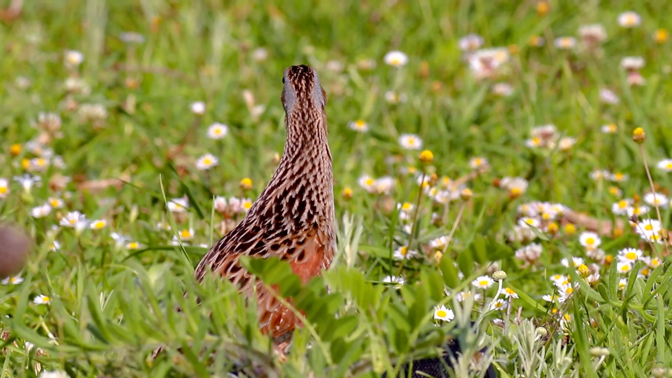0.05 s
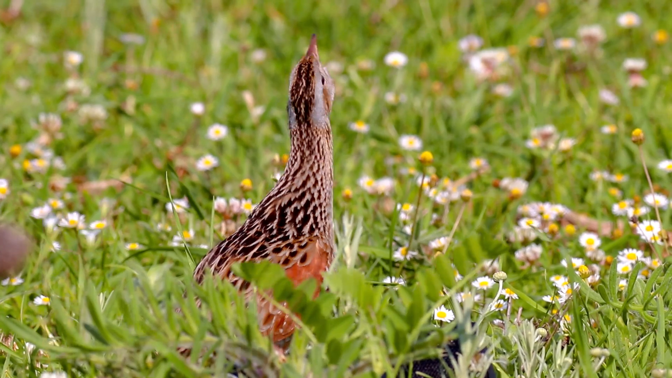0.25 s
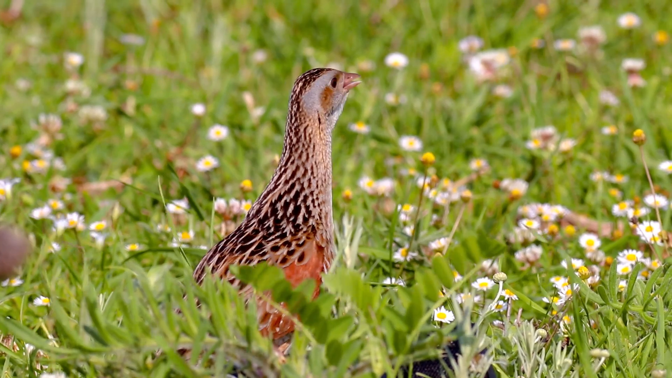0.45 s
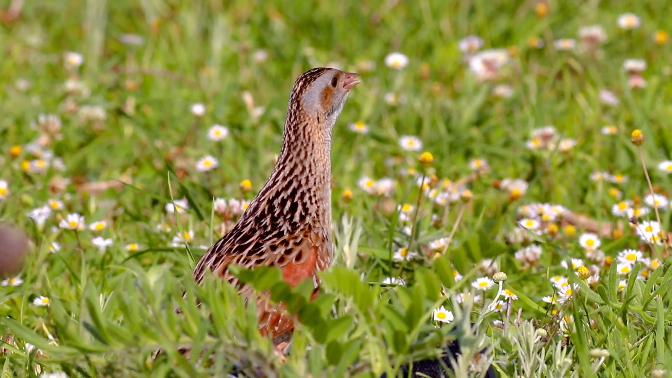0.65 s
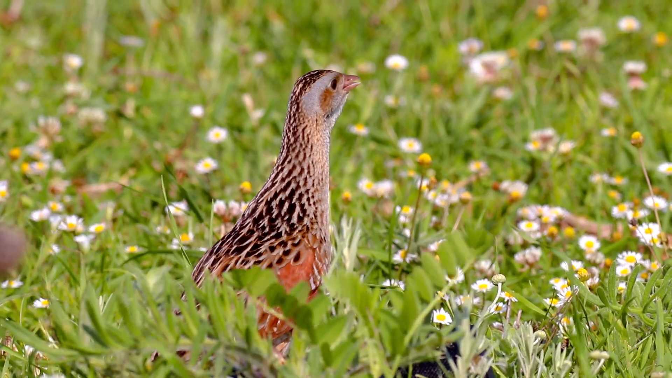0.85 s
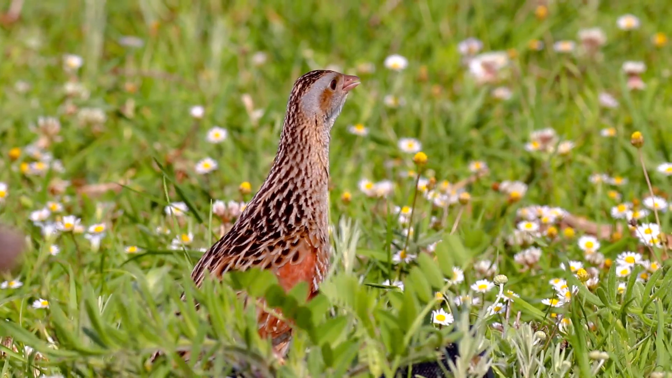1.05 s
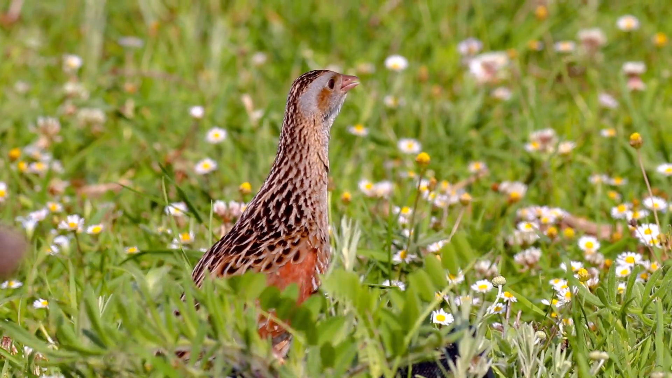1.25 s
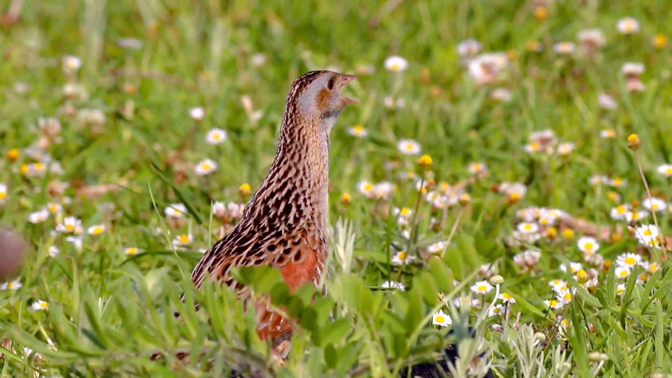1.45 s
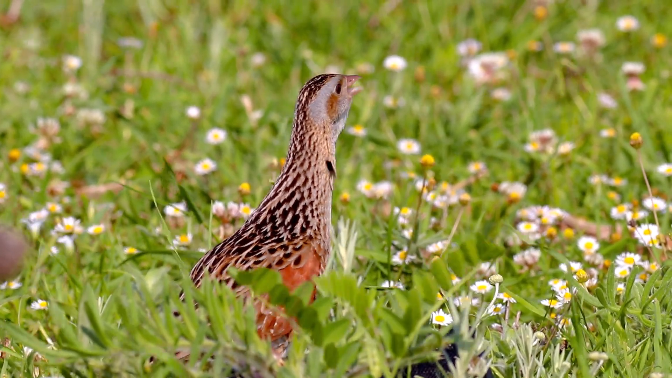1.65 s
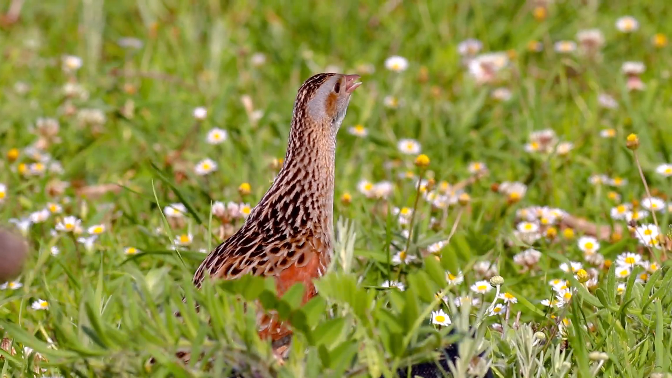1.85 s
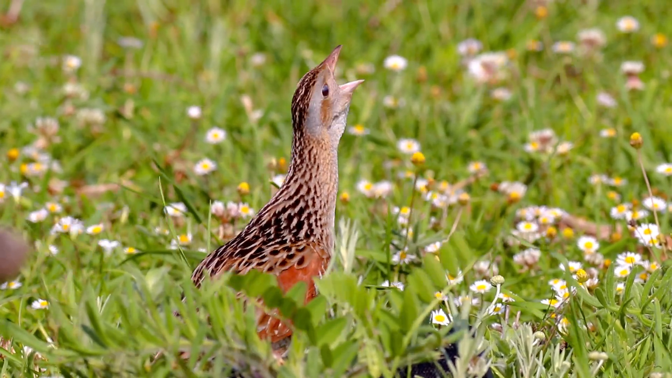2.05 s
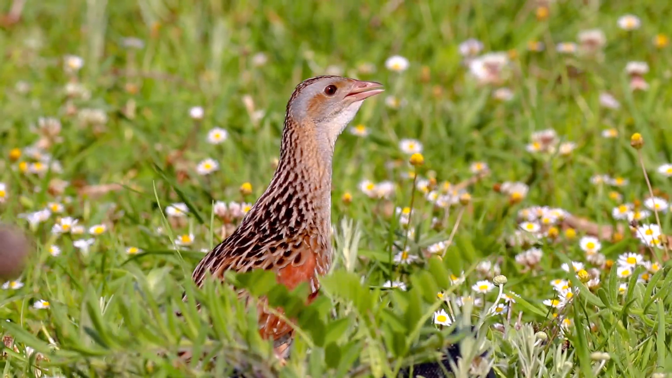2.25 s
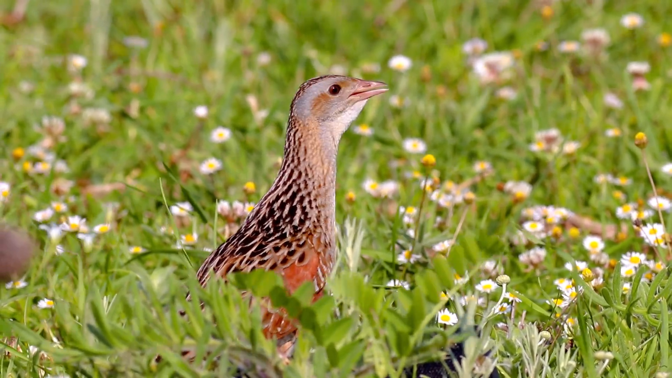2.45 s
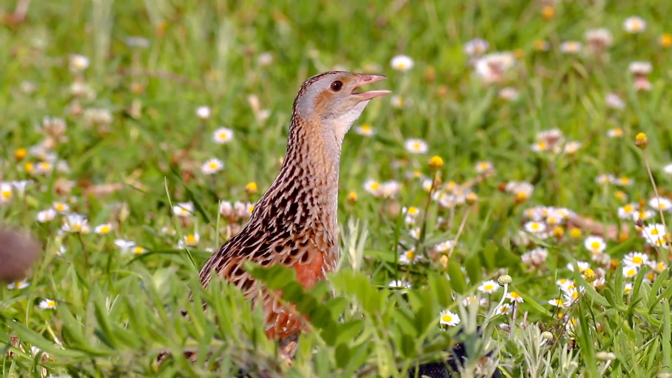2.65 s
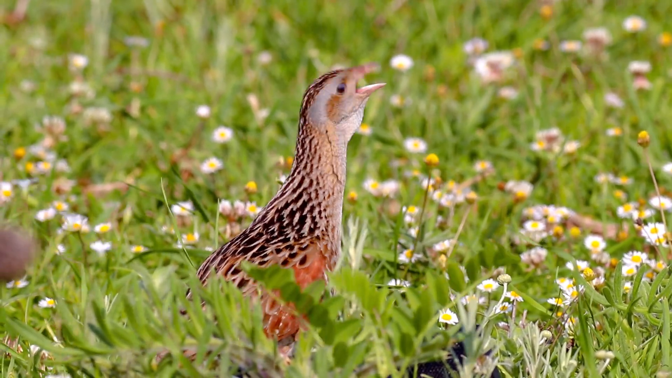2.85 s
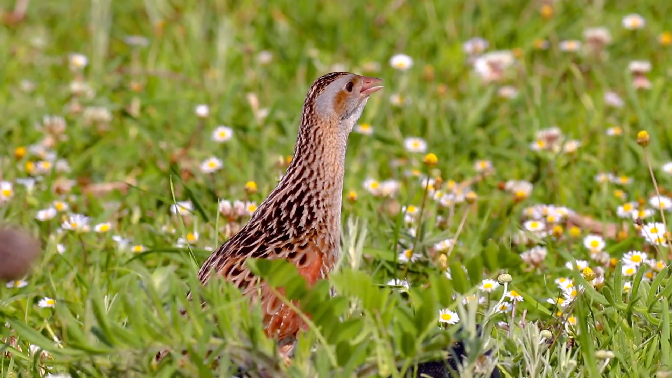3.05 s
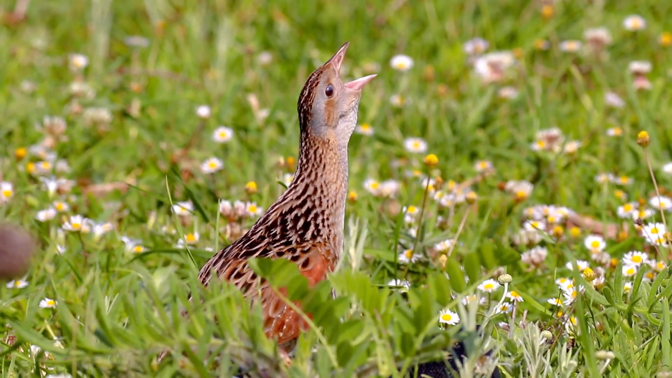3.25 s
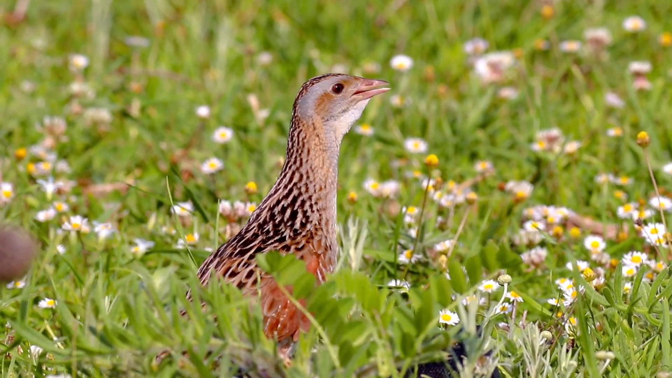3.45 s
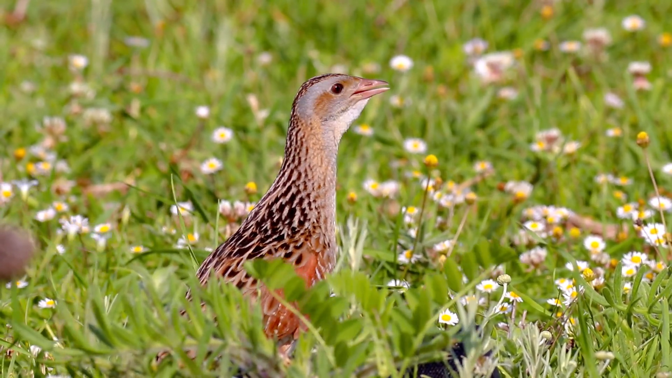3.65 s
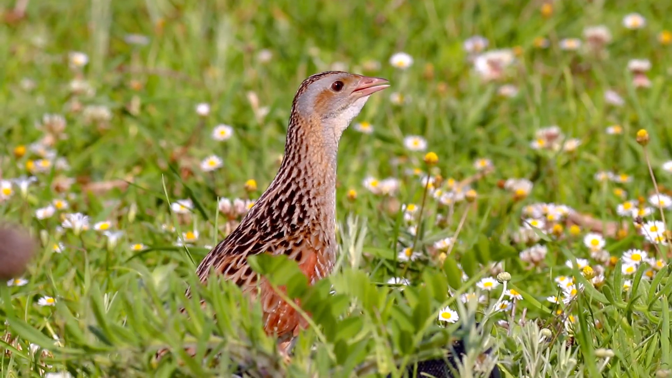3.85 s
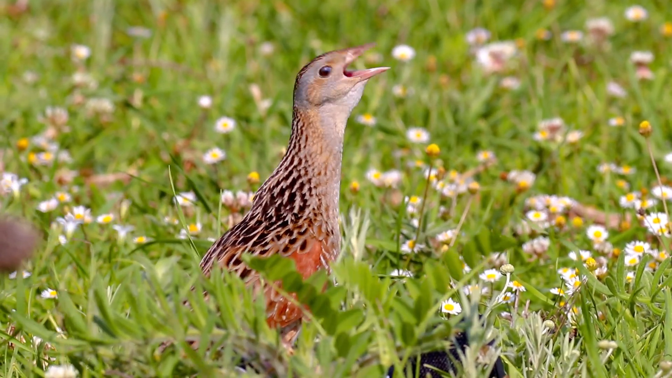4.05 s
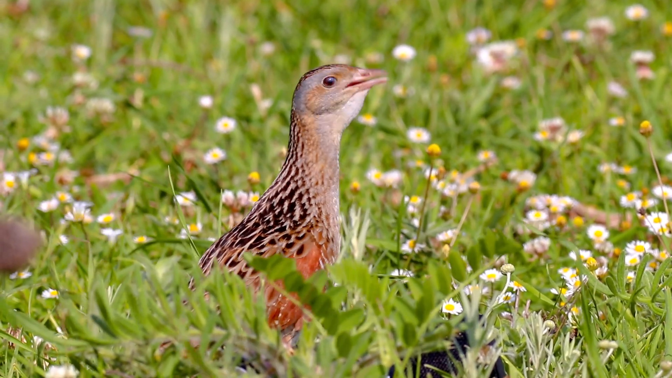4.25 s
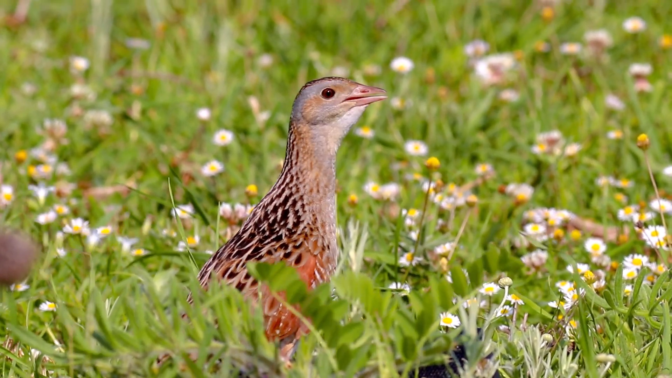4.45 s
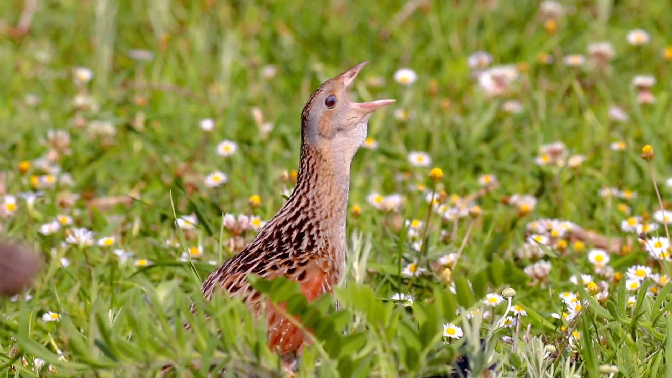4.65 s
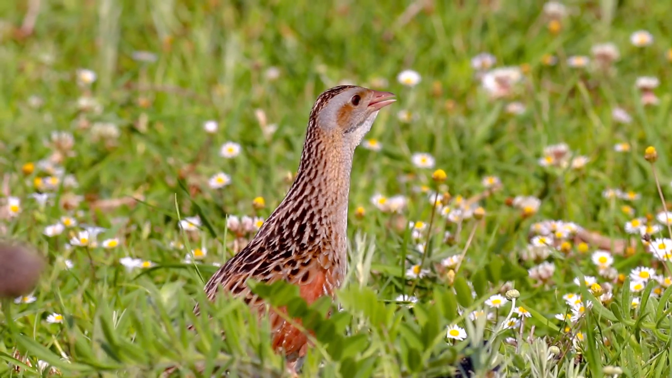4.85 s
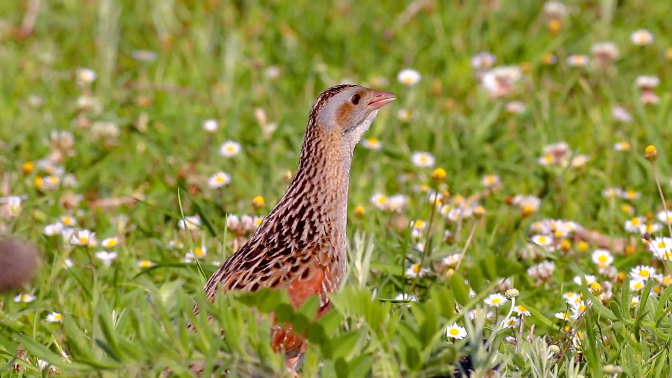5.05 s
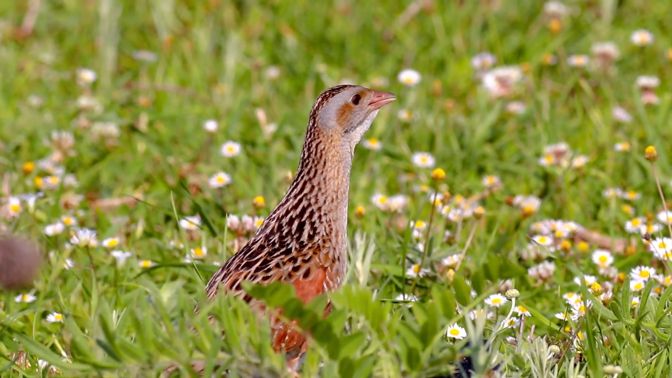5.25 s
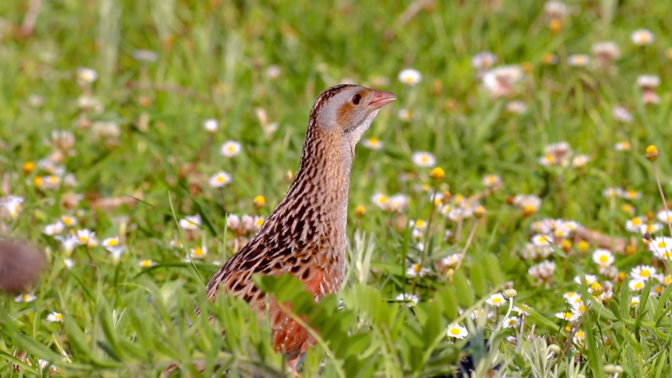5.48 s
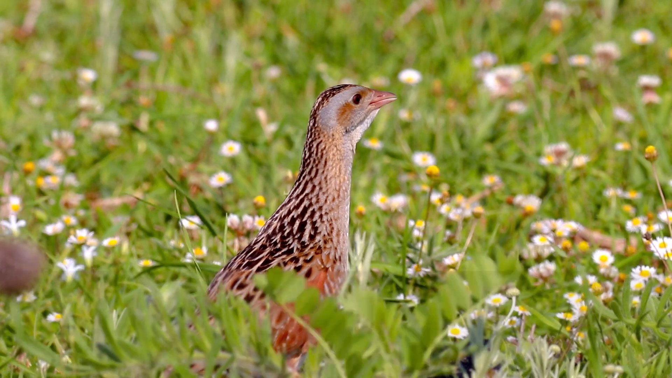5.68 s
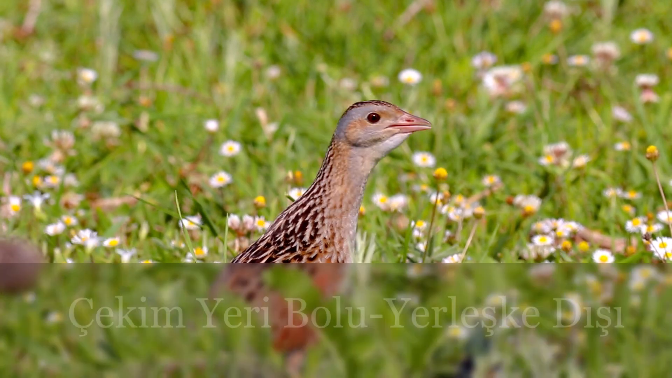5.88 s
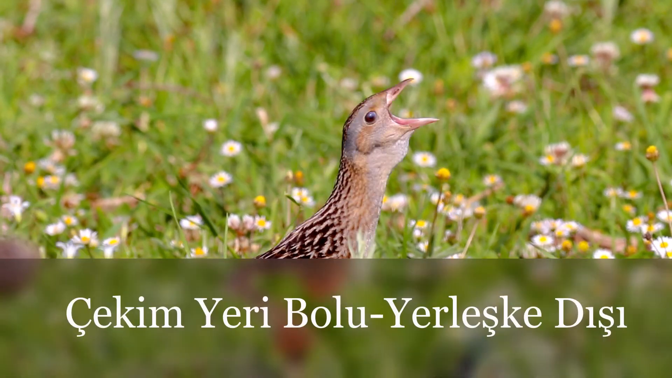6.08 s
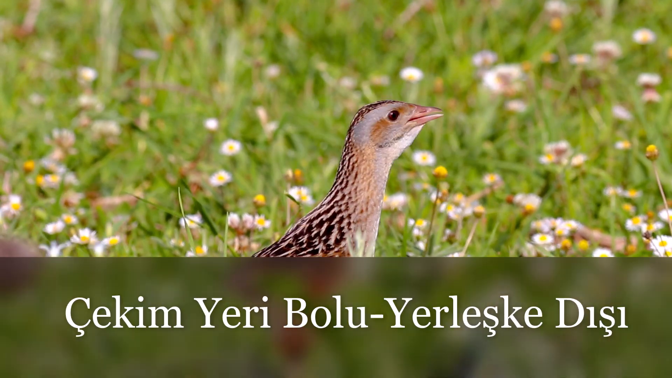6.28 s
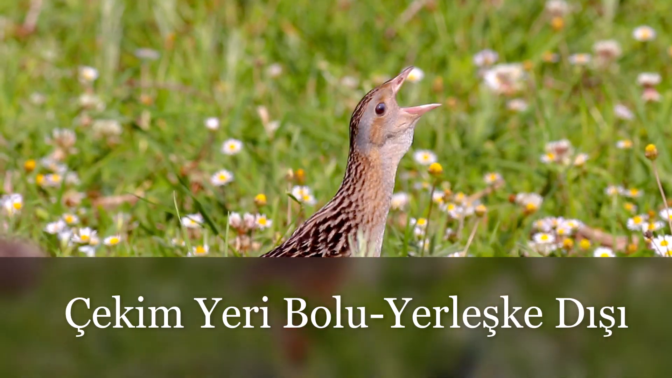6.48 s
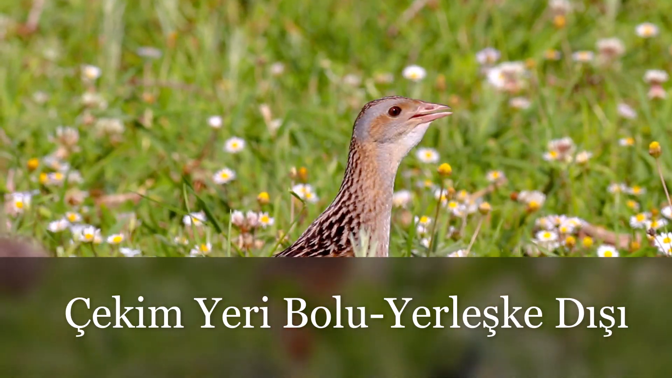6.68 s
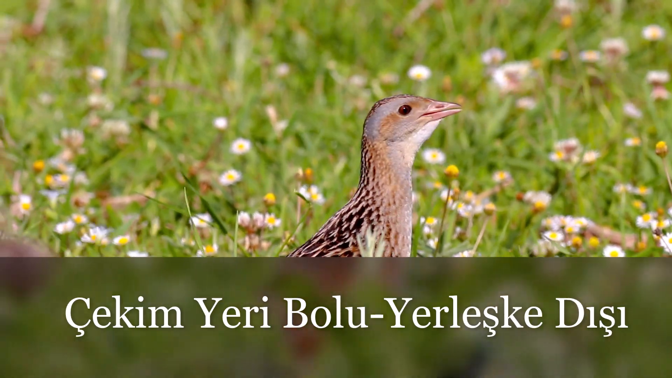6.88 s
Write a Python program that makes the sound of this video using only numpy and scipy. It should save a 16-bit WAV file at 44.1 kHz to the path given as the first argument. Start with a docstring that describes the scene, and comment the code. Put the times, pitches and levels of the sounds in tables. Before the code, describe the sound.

A crake very close to the microphone gives dry, mechanical double rasps, each a quick rattle of clicks under a fifth of a second. Between them small birds twitter thinly over a distant soft rush. A low wind gust buffets the microphone around three seconds. Later come sharp chips, buzzy chirps and a farther rival's answering rasps.

```python
"""A meadow: a corn crake rasps its double call close by, and a rival further off answers with two rasps.
Each rasp is a train of syrinx pulses in limping threes; grass scatters it and a wood edge throws it back.
Small birds twitter, chip and chirp as gliding whistles over a far rush and rumble of filtered noise.
Wind and soft bumps, also shaped noise, play on the microphone; gain control ducks everything when it gets loud."""
import sys
import numpy as np
from scipy import signal
from scipy.fft import rfft, irfft
from scipy.io import wavfile
from scipy.ndimage import uniform_filter1d

SR = 44100
rng = np.random.default_rng(int(sys.argv[2]) if len(sys.argv) > 2 else 0)


def output_pcm(signal):
    """Save a mono or channel-first signal as 16-bit PCM at the path in sys.argv[1].

    Samples are clipped to [-1, 1] before scaling.
    """
    pcm = np.clip(np.atleast_2d(signal).T, -1, 1) * 32767
    wavfile.write(sys.argv[1], SR, np.round(pcm).astype(np.int16))


N = 305172
TIME = np.arange(N) / SR

# rasps of the near bird: first pulse t/s, last pulse t/s, mid-rasp drag/ms, relative level/dB,
# treble from 10 kHz up/dB, left minus right/dB
RASPS = [(-.27, -.1, 0.91, -1, 0, 0), (.2513, .4343, 1.0, -1.5, -2.5, 1.5),
         (1.555, 1.698, 1.44, -1.5, -3.5, 1.5), (2.0024, 2.175, 1.6, -1, -2.5, 0.5),
         (2.7664, 2.9188, .5, -2, 1.5, 0.5), (3.2322, 3.4052, 1.87, -1.5, -3.5, -0.5),
         (4.1564, 4.3002, 0.39, -1, 3.5, 0.5), (4.6131, 4.7802, 1.2, -2, 3.5, 0),
         (6.0654, 6.2086, 0.45, -3, 1.5, 0), (6.5411, 6.7064, 2.28, -1.5, 0.5, 1.5)]
# rasps of the rival, same columns
RIVAL_RASPS = [(5.5657, 5.737, 0, -6.5, 0, -0.095), (6.4813, 6.655, 0.025, -14.5, 0, -.5)]
# gaps in a group of three pulses, scaled to fill the rasp: share of the rasp (0-1),
# then relative short, middle and long gap
RHYTHM = [(0, 5.9, 7.4, 9.6), (.2, 6.8, 7.9, 10.5), (.55, 6.7, 7.9, 9.6), (.88, 7.7, 9.3, 9.0),
          (1, 11.2, 9.9, 10.7)]
# membrane claps in a pulse, before stretch and chance: delay/ms, ring f/Hz, decay/ms, relative level/dB,
# own left minus right/dB, right ear lag/ms
CLAPS = [(-1.3, 3100, 0.14, -14, -4, .02), (0.58, 5350, 0.17, -1, -2, 0.021),
         (0.93, 3800, 0.13, -2, -3, 0.018), (1.83, 3295, 0.16, -1, -2, .02),
         (4, 3400, 0.16, -10, -8.5, .02)]
# narrow resonances of the windpipe: f/Hz, width/Hz, relative level/dB
WINDPIPE = [(2413, 190, -2.5), (3050, 420, -2), (4115, 100, -5.5), (5370, 50, -0.5), (6940, 314, 2)]
# colour of throat and open bill, near bird then rival: f/Hz, level/dB
BILL = [(300, -17), (900, -13), (1200, -3), (1520, -8), (1850, 2), (2300, 6), (2700, -4.5), (3200, 1),
        (4500, 1.5), (6200, 2), (7000, 4), (7600, 2), (9600, -4), (15000, 6)]
RIVAL_BILL = [(300, -15.5), (1400, -13.5), (2000, -3.5), (2400, 0.5), (2850, 1.5), (3250, -4.5), (3900, -2),
              (4400, -4.5), (4850, -5.5), (5350, 2), (6700, -10), (7500, -20.5), (10000, -39), (15000, -26)]
# colour of the echo from the wood edge: f/Hz, level/dB
WOOD = [(500, 8), (2000, -4), (4000, -4), (6300, 3), (8000, -0.5), (11000, -2), (15000, -28)]

# spectral shape of the far rush of the valley, then of its low rumble: f/Hz, relative level/dB
RUSH = [(30, -32), (200, -11), (400, -4.5), (750, 2), (1050, 2), (1350, -6.5), (1800, -12.5), (3000, -16.5),
        (5000, -11), (7000, -21), (10000, -23.5), (15000, -31.5)]
RUMBLE = [(20, -37), (60, -7), (120, -0.5), (200, -2), (400, -6.5), (800, -11.5), (2000, -55)]
# the rumble starts at this level and fades
RUMBLE_DB, RUMBLE_FADE_DB_PER_S = -47.3, .6
# one gust on the microphone: t/s, level before GUST_DB/dB
WIND = [(2.15, -62), (2.31, -46), (2.638, -52), (2.712, -38), (2.81, -54), (3.05, -31), (3.116, -38),
        (3.396, -40), (3.47, -66)]
GUST_DB = 3.8
# spectral shape of wind on the microphone: f/Hz, relative level/dB
WIND_COLOUR = [(20, 1), (45, -1.5), (110, 0.5), (200, -5), (400, -27.5), (800, -44), (2000, -40),
               (15000, -110)]
# the breeze slowly freshens
BREEZE_DB, BREEZE_RISE_DB_PER_S = -60, 1.3
# breeze and rumble sink together in one lull
LULL_S, LULL_WIDTH_S, BREEZE_LULL_DB, RUMBLE_LULL_DB = 4.55, .85, -22, -5
# soft bumps on the microphone: t/s, relative level/dB, rise and decay/s, upper f/Hz where it rolls off
BUMPS = [(3.005, -32.5, .025, 130), (3.278, -15.5, .016, 360), (3.372, -25, .01, 250),
         (3.73, -40.5, .021, 330), (5.538, -38, .0049, 1610), (5.785, -42, .017, 200)]

# bouts of a small bird's twitter: first phrase t/s, last phrase t/s, relative level/dB
TWITTER_BOUTS = [(.11, .32, -48), (.55, 1.05, -47.5), (1.305, 3.515, -49.5), (3.745, 4.42, -52),
                 (5.16, 5.87, -55)]
# approximate phrase spacing, and the fade through a bout
PHRASE_S, TWITTER_FADE_DB_PER_S = .245, .5
# a phrase is three falling slurs, then three arches; levels are relative to the bout
SLUR_HZ, SLUR_FALL_HZ, SLUR_S, SLUR_DB = 5030, 420, .0284, -1.5
ARCH_HZ, ARCH_S, ARCH_AFTER_S, ARCH_DB = 5150, .024, .075, -2.5
# arched chips of another bird, each led in by a softer one: t/s, level/dB
CHIPS = [(4.015, -46), (4.13, -47), (4.488, -45), (4.92, -42), (5.091, -40.5), (5.522, -46), (5.944, -46)]
CHIP_HZ, CHIP_FALL_HZ, CHIP_S, LEAD_IN_S, LEAD_IN_DB = 4200, 300, .0275, .033, -9
# buzzy falling chirps in two voices at once: t/s, length/s, low voice level/dB, high voice level/dB
CHIRPS = [(5.235, .045, -42.5, -36), (5.742, .056, -41, -41.5), (6.365, .08, -44.5, -49),
          (6.841, .062, -41, -50)]
# CHIRP_FALL is a share of the starting pitch
CHIRP_LOW_HZ, CHIRP_HIGH_HZ, CHIRP_FALL, CHIRP_BUZZ = 3880, 5120, .1, .8
# slurred whistles: t/s, length/s, start f/Hz, end f/Hz, level/dB
WHISTLES = [(6.408, .061, 3310, 3070, -38.5), (6.662, .014, 3660, 3480, -19.5),
            (6.7, .095, 2780, 2940, -39), (6.903, .046, 2860, 2950, -42)]
WHISTLE_BUZZ = .35

# the level dips briefly and comes back a little higher than before: t/s, level/dB
DIP = [(5.435, -1), (5.452, -18), (5.465, -34), (5.478, -15), (5.495, 1.5)]
# room ahead of each rasp's first pulse for early claps; upper edge of the final low-pass
LEAD_S, TOP_HZ = .004, 15800


def undb(db):
    """Decibels to gain."""
    return 10 ** (np.asarray(db) / 20)


def curve(rows, at=TIME):
    """Straight lines through (position, value) rows."""
    return np.interp(at, *np.transpose(rows))


def pan(db):
    """Left and right gains for a level difference."""
    return undb(np.array([[db], [-db]]) / 2)


def unit(x):
    """Scale to rms 1."""
    return x / np.sqrt(np.mean(x ** 2))


def add(out, start, sound):
    """Mix a stereo sound in at a time, cut to the scene."""
    i = int(round(start * SR))
    a, b = max(i, 0), min(i + sound.shape[-1], N)
    if b > a:
        out[:, a:b] += sound[:, a - i:b - i]


def colour(x, points, size=4096):
    """Causal minimum-phase filter with the given (Hz, dB) response, built by folding its cepstrum."""
    hz, db = np.transpose(points)
    bins = np.maximum(np.arange(size // 2 + 1), 1) * SR / size
    response_db = np.interp(np.log(bins), np.log(hz), db)
    cepstrum = irfft(np.log(undb(response_db)))
    cepstrum[1:size // 2] *= 2
    cepstrum[size // 2 + 1:] = 0
    impulse = irfft(np.exp(rfft(cepstrum)))
    return signal.fftconvolve(x, impulse[None], axes=-1)[:, :x.shape[-1]]


def walk(rate):
    """Slow random drift of rms 1, from smoothed steps at a rate in Hz."""
    hold = int(SR / rate)
    steps = rng.standard_normal(N)[np.arange(N) // hold]
    return unit(uniform_filter1d(uniform_filter1d(steps, hold), hold))


def noise(points, side_db, size=N, channels=2):
    """Coloured stereo noise of rms 1; the side level sets its width."""
    mid, side = rng.standard_normal((channels, size))
    stereo = mid + undb(side_db) * side * np.array([[1], [-1]])
    return unit(colour(stereo, points))


def scatter(x, envelope, channels=2):
    """Countless small reflections under an envelope, different at each ear."""
    response = rng.standard_normal((channels, len(envelope))) * envelope
    return signal.fftconvolve(x, response / np.sqrt(np.sum(envelope ** 2)), axes=-1)


def pulse_times(length, drag_ms, pulse_hz):
    """Pulses in limping groups of three that drag in mid-rasp, even out and slow at the end."""
    k = np.arange(round(length * pulse_hz))
    share, *gaps = np.transpose(RHYTHM)
    gap = np.choose(k % len(gaps), [np.interp(k / k[-1], share, g) for g in gaps])
    done = np.append(0, np.cumsum(gap)) / gap.sum()
    return length * done + drag_ms / 1000 * np.sin(np.pi * done)


def rasp(onsets, stretch, spacing_spread, puff_db, puff_s, ring_spread=.08, fade_db=2,
         clap_spread_db=1.5, edge=1.59, leak_db=-20, size=10240):
    """Each pulse claps unevenly, ringing for a cycle or two, and puffs air; the first pulses snap hardest."""
    t = np.arange(size) / SR - LEAD_S
    claps, flow = np.zeros((2, size)), np.zeros(size)
    accent_db, accent_s = 4.5, .014
    for onset in onsets:
        spacing = stretch * (1 + spacing_spread * rng.standard_normal())
        accent = accent_db * np.exp(-(onset / accent_s) ** 2)
        effort = -fade_db * (onset / onsets[-1]) ** 4
        for delay_ms, hz, decay_ms, db, pan_db, lag_ms in CLAPS:
            ring, force, slip = rng.standard_normal(size=3)
            start = onset + delay_ms * (spacing + spacing_spread * slip / 2) / 1000
            i = max(int((start + LEAD_S) * SR), 0)
            ear_lag = np.array([[0], [lag_ms]]) / 1000
            age = np.maximum(t[i:i + 128] - start - ear_lag, 0)
            decays = age * 1000 / decay_ms
            envelope = (decays * np.exp(1 - decays)) ** edge
            clap = envelope * np.sin(2 * np.pi * hz * (1 + ring_spread * ring) * age)
            # claps further from the onset take less of the accent
            clap_db = db + effort + accent / (1 + abs(delay_ms)) + clap_spread_db * force
            claps[:, i:i + age.shape[1]] += clap * undb(clap_db) * pan(pan_db)
        since = np.maximum(t - onset, 0) / puff_s
        flow += since * np.exp(1 - since)
        # a little air also leaks before the membranes part
        flow += undb(leak_db) * np.exp(-np.abs(t - onset) / 0.0042)
    air_colour = [(1200, -2), (2000, -5.5), (6000, 4), (8000, 6), (10500, -0.5), (15000, -17)]
    air = noise(air_colour, side_db=-3, size=size)
    return claps + undb(puff_db) * flow * air


def near_voice(length, drag_ms):
    """The near bird's pulse train rings in its windpipe."""
    onsets = pulse_times(length, drag_ms, pulse_hz=120.5)
    pulses = rasp(onsets, stretch=0.996, spacing_spread=0.044, puff_db=-22.0, puff_s=0.0013)
    voice = pulses.copy()
    for hz, width, db in WINDPIPE:
        voice += undb(db) * signal.lfilter(*signal.iirpeak(hz, hz / width, fs=SR), pulses)
    return voice


def crake(rows, voice, bill, level_db, grass_db, grass_s, echo_db, echo_delay_s=0.2, echo_spread_s=0.058):
    """Rasps through the bill, scattered at once by the grass and later by the wood edge."""
    near, far = np.zeros((2, N)), np.zeros((2, N))
    t, soon = TIME[:SR // 2], TIME[:SR // 20]
    grass = np.exp(-soon / grass_s) * (1 - np.exp(-soon / grass_s))
    wood = np.exp(-.5 * ((t - echo_delay_s) / echo_spread_s) ** 2)
    # a diffuse tail swells in under the echo
    wood += 0.98 * np.exp(-t / 0.24) * np.minimum(t / 0.035, 1)
    for start, end, drag_ms, db, treble_db, pan_db in rows:
        call = colour(voice(end - start, drag_ms), [(7000, 0), (10000, treble_db)]) * undb(db + level_db)
        add(near, start - LEAD_S, call * pan(pan_db))
        add(near, start - LEAD_S, undb(grass_db) * scatter(call, grass) * pan(pan_db))
        add(far, start - LEAD_S, undb(echo_db) * scatter(call, wood))
    return colour(near + colour(far, WOOD), bill)


def meadow():
    """A wide far rush, a narrow rumble, and a breeze with one gust that buffets the microphone."""
    lull = np.exp(-((TIME - LULL_S) / LULL_WIDTH_S) ** 2)
    rush = noise(RUSH, side_db=-1) * undb(-42.5 + .5 * walk(14)) * pan(2.7)
    rumble_db = RUMBLE_DB - RUMBLE_FADE_DB_PER_S * TIME + RUMBLE_LULL_DB * lull + 2.6 * walk(13)
    rumble = noise(RUMBLE, side_db=-24) * undb(rumble_db) * pan(0.91)
    gust = undb(curve(WIND) + GUST_DB) * (TIME > WIND[0][0]) * (TIME < WIND[-1][0])
    breeze = undb(BREEZE_DB + BREEZE_RISE_DB_PER_S * TIME + BREEZE_LULL_DB * lull)
    wind = noise(WIND_COLOUR, side_db=-3) * (gust + breeze) * undb(2 * walk(25)) * pan(-3.5)
    return rush + rumble + wind


def note(length, start_hz, end_hz, db, arch_hz=0, buzz=0, overtone_db=-32, buzz_hz=160, waver_hz=150):
    """A songbird's gliding whistle; a buzz throbs its level and shakes its pitch."""
    u = np.linspace(0, 1, int(length * SR))
    throb_hz = buzz_hz * (1 + 0.063 * rng.standard_normal())
    throb = 2 * np.pi * (throb_hz * length * u + rng.random())
    glide = start_hz + (end_hz - start_hz) * u + arch_hz * np.sin(np.pi * u)
    waver = unit(uniform_filter1d(rng.standard_normal(len(u)), size=90))
    hz = glide - 280 * buzz * np.sin(throb) + waver_hz * np.sqrt(abs(buzz)) * waver
    phase = 2 * np.pi * np.cumsum(hz) / SR
    swell = np.sin(np.pi * u) * (1 + buzz * np.cos(throb))
    tone = np.sin(phase) + undb(overtone_db) * np.sin(2 * phase)
    return unit(swell * tone) * undb(db) * pan(0)


def far_twitter(db=-59, spread_db=3, blur_s=.012, count=90):
    """Similar arched slurs, faint, blurred and scattered at random, from deeper in the meadow."""
    out = np.zeros((2, N))
    for when, pitch, force in rng.random((count, 3)):
        hz = 4850 + 450 * pitch
        add(out, when * N / SR, note(0.033, hz, hz - 300, db + spread_db * (2 * force - 1), arch_hz=90))
    return scatter(out, np.exp(-TIME[:SR // 10] / blur_s))[:, :N]


def twitter(step_s=.034, vary_db=1.6, pitch_spread=.006):
    """Phrases of slurs and arches at an even pace, no two alike, fading through each bout."""
    out = np.zeros((2, N))
    for first, last, db in TWITTER_BOUTS:
        for start in np.linspace(first, last, round((last - first) / PHRASE_S) + 1):
            phrase_db = db - TWITTER_FADE_DB_PER_S * (start - first)
            for k in np.arange(3):
                force, pitch = rng.standard_normal((2, 2))
                slur_hz, arch_hz = np.array([SLUR_HZ, ARCH_HZ]) * (1 + pitch_spread * pitch)
                slur_db, arch_db = phrase_db + vary_db * force + [SLUR_DB, ARCH_DB]
                slur = note(SLUR_S, slur_hz, slur_hz - SLUR_FALL_HZ, slur_db)
                arch = note(ARCH_S, arch_hz, arch_hz - 100, arch_db, arch_hz=126)
                add(out, start + k * step_s, slur)
                add(out, start + ARCH_AFTER_S + k * step_s, arch)
    return out


def songbirds(wet_db=-5, tail_s=0.02):
    """Twitters, chips and chirps from around the meadow, blurred by distance."""
    dry = twitter() + chips() + chirps()
    return dry + undb(wet_db) * scatter(dry, np.exp(-TIME[:SR // 2] / tail_s))[:, :N]


def bumps():
    """Dull knocks of low-passed noise that swell and die away."""
    out, t = np.zeros((2, N)), TIME[:SR // 2]
    for start, db, decay_s, top_hz in BUMPS:
        dull = [(top_hz / 10, -10), (top_hz / 3, 1), (top_hz, -3), (top_hz * 4, -36), (15000, -90)]
        envelope = t / decay_s * np.exp(1 - t / decay_s)
        thud = noise(dull, side_db=-1, size=len(t)) * envelope
        add(out, start, thud * undb(db) * pan(-7))
    return out


def chips():
    """Pairs of arched, falling whistles with a clear overtone, soft then loud."""
    out = np.zeros((2, N))
    for start, db in CHIPS:
        for early_s, soft_db in [(LEAD_IN_S, LEAD_IN_DB), (0, 0)]:
            hz = CHIP_HZ + 50 * rng.standard_normal()
            chip = note(CHIP_S, hz, hz - CHIP_FALL_HZ, db + soft_db, arch_hz=253, overtone_db=-13.5)
            add(out, start - early_s, chip)
    return out


def chirps():
    """Both sides of a syrinx buzz and fall together; plainer whistles join the later chirps."""
    out = np.zeros((2, N))
    for start, length, low_db, high_db in CHIRPS:
        for hz, db in [(CHIRP_LOW_HZ, low_db), (CHIRP_HIGH_HZ, high_db)]:
            add(out, start, note(length, hz, hz * (1 - CHIRP_FALL), db, buzz=CHIRP_BUZZ))
    for start, length, start_hz, end_hz, db in WHISTLES:
        add(out, start, note(length, start_hz, end_hz, db, buzz=WHISTLE_BUZZ))
    return out


def rival_voice(length, drag_ms):
    """The rival pulses a little faster, with tighter but less regular claps and more air."""
    onsets = pulse_times(length, drag_ms, pulse_hz=128.4)
    return rasp(onsets, stretch=0.788, spacing_spread=0.093, puff_db=-11, puff_s=0.002)


def scene():
    """Both crakes, the songbirds and the meadow, with the brief dip in level."""
    near = crake(RASPS, near_voice, BILL, level_db=2.5, grass_db=-13.5, grass_s=.0036, echo_db=-30)
    rival = crake(RIVAL_RASPS, rival_voice, RIVAL_BILL, level_db=3.5, grass_db=-5.5, grass_s=0.0061, echo_db=-55)
    mix = near + rival + songbirds() + far_twitter() + meadow() + bumps()
    return mix * undb(curve(DIP))


def gain_control(x, threshold_db=-22.0, slope=0.78):
    """Turns loud passages down over about two pulses and lets go more slowly."""
    # release is the time to let go by one neper (8.7 dB) of level
    window_s, attack_s, release_s = .025, .016, .095
    power = uniform_filter1d(np.mean(x ** 2, axis=0), int(window_s * SR))
    log_level = np.log(np.maximum(power, 1e-12)) / 2
    # the level may jump up at once but only falls at the release rate
    held = np.maximum.accumulate(log_level + TIME / release_s) - TIME / release_s
    over = np.maximum(held - np.log(undb(threshold_db)), 0)
    return x * np.exp(-min(slope, 1) * uniform_filter1d(over, int(attack_s * SR)))


def record(dry):
    """Gain control, then a steep low-pass cuts the top."""
    low_pass = signal.ellip(8, .2, 70, TOP_HZ, fs=SR, output="sos")
    return signal.sosfilt(low_pass, gain_control(dry))


dry = scene()
out = record(dry)
output_pcm(out)
```